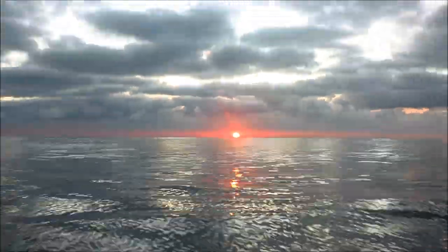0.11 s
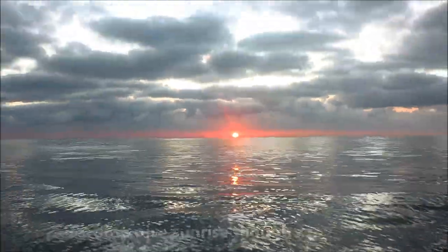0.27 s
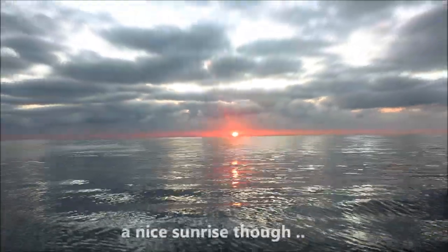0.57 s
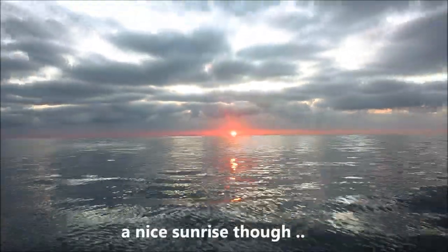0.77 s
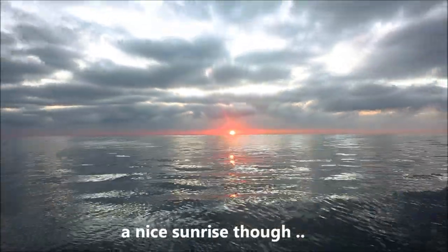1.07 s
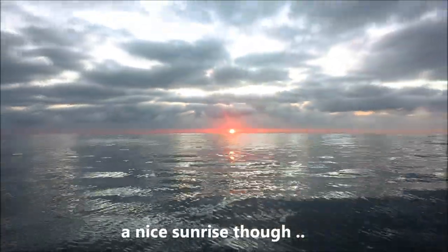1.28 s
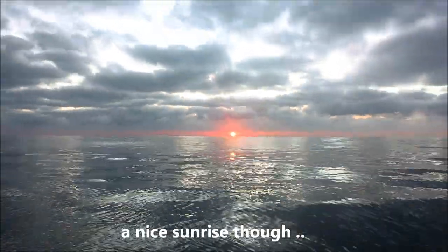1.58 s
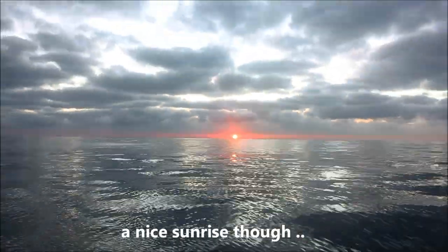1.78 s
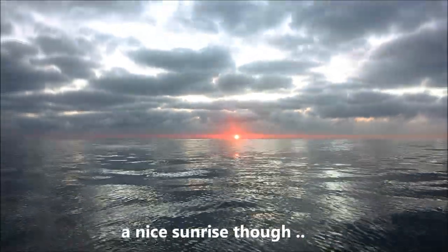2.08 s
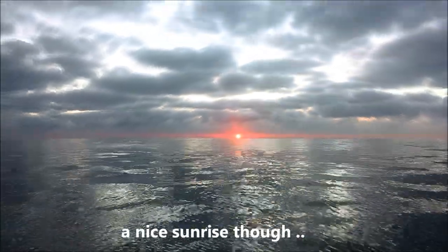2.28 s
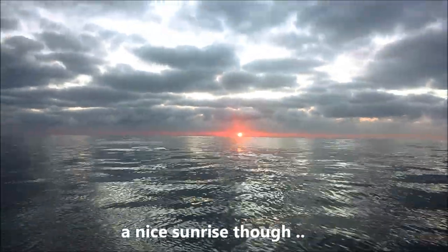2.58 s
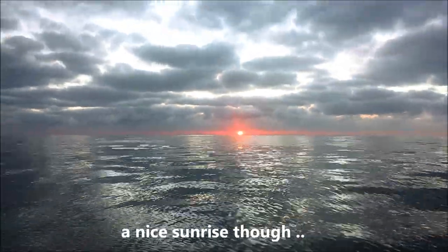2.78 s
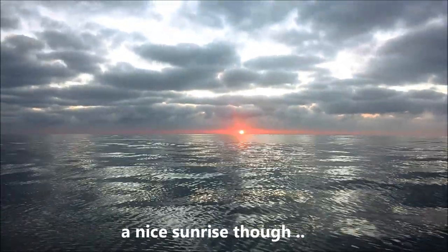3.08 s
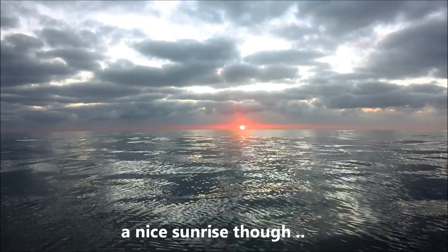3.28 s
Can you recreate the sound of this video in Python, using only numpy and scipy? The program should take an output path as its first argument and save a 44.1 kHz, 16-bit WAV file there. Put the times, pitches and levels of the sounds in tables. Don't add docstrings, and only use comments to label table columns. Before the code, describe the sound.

A loaded rope creaks on a becalmed boat. Fittings rattle and hollow blocks knock at 0.15-0.4 s. The rope's rapid ticking, hissing groan runs 0.4-0.95, ending in a sharp clack, then slows until 1.2 amid loud sail slaps, a low knock and wind thumps. It creaks again 1.4-2.0. Ticks and a metallic rattle follow around 2.1-2.5, then dense clacks, cloth rustles and slaps 2.65-3.15, over faint lapping water.

```python
import sys
import numpy as np
from scipy import signal
from scipy.fft import rfft, irfft, next_fast_len
from scipy.io import wavfile
from scipy.ndimage import uniform_filter1d, map_coordinates

SR = 44100
rng = np.random.default_rng(int(sys.argv[2]) if len(sys.argv) > 2 else 0)


def put_to_file(sound):
    columns = np.atleast_2d(sound).T
    safe = np.clip(columns, -1, 1)
    whole_steps = np.round(safe * 32767)
    wavfile.write(sys.argv[1], SR, whole_steps.astype(np.int16))


def field_ratio(decibels):
    return 10 ** (np.asarray(decibels, dtype=float) / 20)


N = 149940


def unit(x):
    return x / np.sqrt(np.mean(x ** 2) + 1e-20)


def along(points, hz):
    f, value = np.transpose(points)
    return np.interp(np.log(hz + 1), np.log(f + 1), value)


def curves(rows):
    s, *cols = np.transpose(rows)
    return [np.interp(np.arange(N) / SR, s, c) for c in cols]


def wobble(rate):
    knots = rng.standard_normal(int(N * rate / SR) + 4)
    return map_coordinates(knots, [np.arange(N) * rate / SR])


def filtered(x, response):
    m = next_fast_len(N + SR // 2)
    return irfft(rfft(x, m) * response(np.fft.rfftfreq(m, 1 / SR)), m)[..., :N]


def peak(f, hz, width):
    return 1j * f * width / (hz * hz - f * f + 1j * f * width)


def click(pulses, spectrum):
    gain = field_ratio(along(spectrum, np.fft.rfftfreq(2048, 1 / SR)))
    return filtered(pulses, lambda hz: field_ratio(along(spectrum, hz))) / np.sqrt(np.mean(gain ** 2))


# pitch_hz, likeness (0 to 1)
ALIKE = [(100, .9), (1000, .92), (3000, .72), (14000, .4)]


def rush(spectrum, alike=ALIKE):
    def mid_side(hz):
        turn = np.arccos(np.clip(along(alike, hz), -1, 1)) / 2
        return field_ratio(along(spectrum, hz)) * [np.cos(turn), np.sin(turn)]

    mid, side = filtered(rng.standard_normal((2, N)), mid_side)
    return unit(np.array([mid + side, mid - side]))


# pitch_hz, level_db
SEA_COLOUR = [(80, -15), (150, -0.5), (450, -5), (2100, -16), (7000, -26.5), (12000, -33.5), (14000, -53)]
# time_s, level_db
SEA_LEVEL = [(0, -50.5), (1.3, -47.5), (2.3, -53), (3.4, -60)]


def sea():
    level_db = curves(SEA_LEVEL)[0] + 0.9 * wobble(5.9) + 3.23 * wobble(60)
    return field_ratio(level_db) * rush(SEA_COLOUR)


# time_s, level_db
AIR_LEVEL = [(0, -84), (.9, -55), (1.15, -48), (1.35, -50.5), (1.7, -47), (2.05, -49.5), (2.3, -47.5),
             (2.55, -51), (3, -55), (3.4, -69)]
# pitch_hz, level_db
RUMBLE = [(12, -33), (30, -10.5), (80, 0), (150, -1.5), (300, -13), (800, -69)]
# centre_s, level_db, pitch_hz
PUFFS = [(0.359, -50.5, 90), (.953, -37, 260), (1.122, -32, 90), (1.22, -29, 127), (1.278, -26.5, 138),
         (1.364, -40, 175), (1.429, -39, 69), (1.504, -34, 108), (1.527, -39, 109), (1.605, -37, 120),
         (1.627, -36, 94.5), (1.742, -37.5, 80), (1.766, -36.5, 120), (1.998, -45, 152.8),
         (2.099, -44.5, 59), (2.309, -43, 130), (2.16, -45, 151), (2.25, -46, 160), (2.335, -41, 190),
         (2.385, -39.5, 258), (2.42, -41, 225), (2.497, -38, 114)]


def air():
    puff_cycles, unpitched_share, port_turn_rad = 1.5, 0.71, 1.6
    t, noise = np.arange(N) / SR, rush(RUMBLE, [(60, 0.15)])
    turn = port_turn_rad * np.array([[-.5], [.5]])
    puffs = np.zeros((2, N))
    for (s, db, hz), chance in zip(PUFFS, rng.standard_normal(len(PUFFS))):
        cycles = hz * (t - s)
        swell = field_ratio(db - 4.6 * (cycles / puff_cycles) ** 2)
        thump = np.cos(2 * np.pi * cycles + turn + 3 * chance)
        puffs += swell * (unpitched_share * noise + thump)
    lumps = field_ratio(4.2 * np.array([wobble(18), wobble(17)]))
    steady = field_ratio(curves(AIR_LEVEL)[0] + 1.0) * lumps * noise
    return (steady + puffs) * field_ratio([[-2.5], [2.5]])


# pitch_hz, fall_by_60_db_s
DECK = [(200, 0.52), (10000, 0.048)]


def deck(x):
    hz, t, z = signal.stft(rng.standard_normal((2, SR // 3)), SR, nperseg=256)
    fade = field_ratio(-60 * t / along(DECK, hz)[:, None])
    tail = signal.istft(z * fade, SR, nperseg=256)[1]
    late = np.pad(x, ((0, 0), (200, 0)))
    return signal.fftconvolve(late, tail / np.linalg.norm(tail[0]), axes=1)[:, :N]


# pitch_hz, width_hz, gain_db
PORTS = [(12700, 5600, -3.5), (7310, 980, -1.5)]


def through_ports(x):
    lag_s = 7e-5

    def response(f):
        cavity = np.array([field_ratio(db) * c * c / (c * c - f * f + 1j * f * w) for c, w, db in PORTS])
        return cavity * np.exp(-1j * np.pi * f * lag_s * np.array([[1], [-1]]))

    return filtered(x, response)


# time_s, level_db
RUSTLE = [(2.7, -61), (2.73, -41), (2.8, -46), (2.9, -39), (2.96, -45), (3.05, -57), (3.09, -62)]
# pitch_hz, level_db
CLOTH = [(200, -20), (900, 6.5), (2500, 1.5), (5000, -3), (9000, -12.5), (14000, -23)]


def dragging_cloth():
    return field_ratio(curves(RUSTLE)[0] + 3.4 * wobble(150)) * rush(CLOTH)


# start_s, level_db, pitch_hz, fall_by_60_db_s
TOCKS = [
    (.215, -32, 1203, 0.067),
    (.321, -37, 483, 0.056),
    (.36, -35.5, 400, 0.063),
    (1.127, -29, 955, .05),
    (1.147, -22.5, 477, 0.089),
    (2.408, -41.5, 606, 0.08),
    (2.719, -24, 907, 0.093),
    (2.884, -26.5, 1720, 0.053),
    (2.929, -32, 2730, .04),
]


def blocks():
    rise_s, spread = 0.0015, .07
    out, t = np.zeros(N + SR), np.arange(SR // 4) / SR
    for (s, db, hz, t60), chance in zip(TOCKS, rng.standard_normal((len(TOCKS), 3))):
        ring = np.zeros(len(t))
        for j, c in zip((-1, 0, 1), chance):
            tone_hz = hz * (1 + spread * (j + 0.31 * c))
            ring += np.sin(2 * np.pi * tone_hz * t + c) / (1 + abs(j))
        out[round(s * SR):][:len(t)] += field_ratio(db - 60 * t / t60) * (1 - np.exp(-t / rise_s)) * ring
    return out[:N]


# pitch_hz, level_db
CLACK = [(250, -50), (700, -22), (1500, -4.5), (3000, 6.5), (5000, -3.5), (8000, -69)]
KNOCK = [(40, -40), (120, -12), (350, -1), (800, -2), (1500, -4), (3000, -26.5), (9000, -62)]
FIZZ = [(1200, -32), (3000, 4), (5000, 8), (8000, 3), (12500, -6.5), (15000, -32)]
# pitch_hz, level_db
SHACKLE = [(800, -3), (920, 2), (1350, -1), (1800, 1.5), (2340, 1.5), (3300, -2.5), (4300, -10)]


def hits(rows, rise_s, crack_db, ring_db, grain_db, level_db, fizz_life):
    delay_s, ring_life = .0012, 0.94
    out, shape, cracks = np.zeros(N + SR), np.zeros((3, N + SR)), np.zeros((3, N))
    t, grain = np.arange(SR // 3) / SR, field_ratio(grain_db * wobble(400))
    band_life = np.array([[1], [1], [fizz_life]])
    for s, db, knock_db, fizz_db, t60 in rows:
        i = round((s + delay_s) * SR)
        size = field_ratio([[db], [db + knock_db + 11], [db + fizz_db - 1.5]])
        rise = 1 - np.exp(-t / rise_s)
        shape[:, i:i + len(t)] += size * rise * field_ratio(-60 * t / (t60 * band_life))
        cracks[:, i + round(rise_s * SR)] = field_ratio(crack_db) * size[:, 0]
        for (hz, tone_db), a, b in zip(SHACKLE, *rng.standard_normal((2, len(SHACKLE)))):
            fade = field_ratio(db + ring_db + tone_db + 2.9 * a - 60 * t / (ring_life * t60))
            out[i:i + len(t)] += fade * np.sin(2 * np.pi * hz * (1 + .1 * b) * t)
    mix = out[:N]
    for envelope, pulses, colour in zip(shape, cracks, (CLACK, KNOCK, FIZZ)):
        mix = mix + grain * envelope[:N] * rush(colour) + click(pulses, colour)
    return field_ratio(level_db) * mix


# start_s, level_db, knock_db, fizz_db, fall_by_60_db_s
SLAPS = [(0.7362, -28, -30, 3, 0.13), (1.036, -34, 0, 4, 0.15), (1.1257, -22.5, 2.5, -2.5, 0.087),
         (1.1444, -37, -5, -3, 0.37), (1.1831, -35, 0.5, 7, 0.17), (1.2435, -35.5, 5.5, -36, 0.15),
         (1.3783, -45.5, 1.5, 0, 0.17), (2.3815, -39, -5, -5, 0.081), (2.4053, -30.5, -5.5, -25, 0.042),
         (2.7811, -23, -11.5, -6, 0.12), (2.8944, -32, -6.5, 2, 0.23), (3.1074, -34.5, -2.5, 3, 0.16),
         (3.1135, -30, -15.5, -4.5, 0.16)]
THUDS = [
    (2.082, -52.5, 17.5, -25, 0.35),
    (2.465, -48, -6, -15, .03),
]


def sail_slaps():
    return hits(SLAPS + THUDS, rise_s=.002, crack_db=7.5, ring_db=-7.5, grain_db=2.0, level_db=-10.0,
                fizz_life=0.88)


# start_s, level_db, knock_db, fizz_db, fall_by_60_db_s
RATTLE = [(0.2006, -20, -17, -3.5, 0.095), (0.2818, -37, -1, 4.5, 0.11), (0.3176, -29.5, -4.5, 3, 0.083),
          (1.0876, -25.5, 1.5, -15, 0.057), (1.3335, -34.5, 2, 3, 0.048), (2.11, -17.5, -15.5, 0.5, 0.12),
          (2.5045, -27.5, -9, 1, 0.05), (2.6688, -23.5, -13, 3.5, 0.083), (2.7195, -24, -9, -1, 0.11),
          (2.749, -34, -11.5, 6, 0.18), (2.7893, -31, -14, -2, 0.08), (2.8847, -21.5, -11, 0, 0.074),
          (2.9277, -23, -19, -3.5, 0.13), (3.003, -34, -8.5, 3, 0.15)]


def rattling_fittings():
    return hits(RATTLE, rise_s=.0008, crack_db=11, ring_db=-10, grain_db=2.5, level_db=-9.5,
                fizz_life=0.68)


# start_s, level_db, knock_db, fizz_db, fall_by_60_db_s
TICKS = [(.209, -30, -11, -4, 0.046), (.2145, -32.5, -7.5, -3, 0.078), (.415, -42, -18, 8, .015),
         (1.197, -41, -10, 6, .015), (1.998, -35, -8, 3, 0.027), (2.005, -37, -20, 5, .02),
         (2.09, -40, -2, 6, 0.028), (2.095, -39, -10, 6, 0.029), (2.2105, -35, -40, 8.5, 0.016),
         (2.2135, -17.5, -40, -1, .014), (2.2395, -49, 4, -10, .02), (2.774, -38, -20, 2, 0.011),
         (2.844, -33, -6, -12, .015), (3.159, -43, -12, 0, .03)]


def sharp_ticks():
    return hits(TICKS, rise_s=.0004, crack_db=9.5, ring_db=-35, grain_db=1.5, level_db=-7,
                fizz_life=0.76)


# start_s, level_db, knock_db, fizz_db, fall_by_60_db_s
CLACKS = [(0.1535, -37, -30, -3.5, 0.032), (0.1783, -30, -28, -21, 0.014),
          (0.2435, -38.5, -5.5, 8.5, 0.035), (0.346, -34, -6.5, 5, 0.051), (0.3595, -32, -1, -11, 0.037),
          (0.3689, -37, -6, 8.5, 0.066), (0.3864, -41.5, -5, 7, 0.06), (0.9496, -19.5, -6, 0, 0.024),
          (1.9765, -34, -15, -2, 0.095), (2.1834, -48, -17, 11, 0.018), (2.242, -45, 3, -28, 0.033),
          (2.64, -40, -24, -8, 0.047), (2.8059, -31.5, -13, 7.5, 0.033), (2.8314, -31, -5, 7.5, 0.029),
          (2.8509, -22.5, -14.5, 2, 0.043), (2.8674, -30.5, -7, 5, 0.045)]


def clacking_fittings():
    return hits(CLACKS, rise_s=0.00047, crack_db=10.5, ring_db=-23, grain_db=2.5, level_db=-7,
                fizz_life=0.71)


# time_s, slips_per_s, slip_db, groan_db
STROKES = [
    [(.405, 119.4, -37, -41.5), (.55, 116.5, -35, -40), (.62, 114, -36, -39.5), (.8, 120, -36, -39.5),
     (.948, 122, -35, -36)],
    [(.958, 105, -38.5, -45.5), (1.17, 96, -37.5, -29.5), (1.228, 83, -51, -47)],
    [(1.417, 87, -38.5, -45.5), (1.55, 84, -36, -43.5), (1.71, 84, -36, -45), (1.75, 111, -37.5, -41),
     (1.86, 103, -35.5, -41), (2.018, 91, -36.5, -41)],
]
# pitch_hz, width_hz, level_db
GROAN = [(176.5, 77, -6.5), (357, 44, -2.5), (490.5, 30.5, -0.5), (660, 71, -6.5), (980, 144, -8),
         (1690, 660, -22), (2310, 68, -14.5)]
GROAN_BACK = [(300, 70, -9), (488, 60, -0.5), (702, 110, -7), (953, 66, -1), (1137, 67, -5),
              (1490, 124, -4.5), (2310, 55, -8)]
GROAN_TILT = [-0.3, -2.3, -0.2]
# time_s, drop_db
LIMP = [(.53, 14), (.62, 4), (.75, 2), (.8, 0)]
# pitch_hz, level_db
SLIP = [(150, -14), (500, 6.5), (1700, -2.5), (4000, 3), (8000, -3.5), (10500, -7), (12800, -6),
        (15000, -36)]
SNAP = [(1500, -40), (4000, -18), (6500, 3), (10000, 3), (12600, -8), (14500, -5)]


def rope():
    jitter, scatter_db, slip_t60_s, snap_db = .015, 1.6, .013, 5
    chatter_s, chatter_db = .004, -10
    rub_db, rub_late_db, rub_grows_s = -13, 8, .3
    pulsing = 0.34
    slips, rub, groan = np.zeros(N), np.zeros(N), np.zeros(N)
    t = np.arange(N) / SR

    def soft(x):
        return uniform_filter1d(x, size=500)

    for rows, tilt_db, body in zip(STROKES, GROAN_TILT, (GROAN, GROAN, GROAN_BACK)):
        rate, level_db, groan_db = curves(rows)
        weak_db = curves(LIMP)[0]
        on = (t >= rows[0][0]) & (t < rows[-1][0])

        chance = rng.standard_normal((99, 4))
        at = np.searchsorted(np.cumsum(rate * on) / SR, np.arange(99) + 1e-6)
        k = np.flatnonzero(at < N)
        at, chance = at[k], chance[k]
        size = field_ratio(level_db[at] - weak_db[at] * (k % 2) + scatter_db * chance[:, 0])
        at = at + (jitter * chance[:, 1] * SR / rate[at]).astype(int)
        slips[at] += size
        chatter_gap = (chatter_s * SR * field_ratio(2.5 * chance[:, 2])).astype(int)
        slips[at + chatter_gap] += size * field_ratio(chatter_db + 2.4 * chance[:, 3])
        not_yet = np.exp(-abs(t - rows[0][0]) / rub_grows_s)
        rub += on * field_ratio(level_db + rub_db - rub_late_db * not_yet)

        def wood(f):
            total = 0
            for j, (hz, width, db) in enumerate(body):
                total = total + (-1) ** j * field_ratio(db + tilt_db * np.log2(hz / 500)) * peak(f, hz, width)
            return total

        pulse = uniform_filter1d(slips, size=120) / soft(slips + 1e-9)
        shake = filtered(rush([(100, 0)]) * (1 + pulsing * pulse), wood)
        groan = groan + soft(on * field_ratio(groan_db)) * shake / shake[:, on].std()

    burst = signal.fftconvolve(slips, field_ratio(-60 * t[:SR // 10] / slip_t60_s))[:N]
    hiss = (burst + soft(rub)) * rush(SLIP)
    return field_ratio(snap_db) * click(slips, SNAP) + hiss + groan * field_ratio(1.7 * wobble(24.87))


def scene():
    near = rope() + clacking_fittings() + blocks() + dragging_cloth()
    near = near + sharp_ticks() + rattling_fittings() + sail_slaps()
    deck_db = -16
    return through_ports(near + field_ratio(deck_db) * deck(near) + sea()) + air()


def band_limit(x):
    return signal.sosfilt(signal.butter(12, 15700, fs=SR, output="sos"), x)


def record(dry):
    edge_hz = 14100
    mix = filtered(dry, lambda hz: 1 / (1 + (hz / edge_hz) ** 28))
    return band_limit(mix)


dry = scene()
out = record(dry)
put_to_file(out)
```